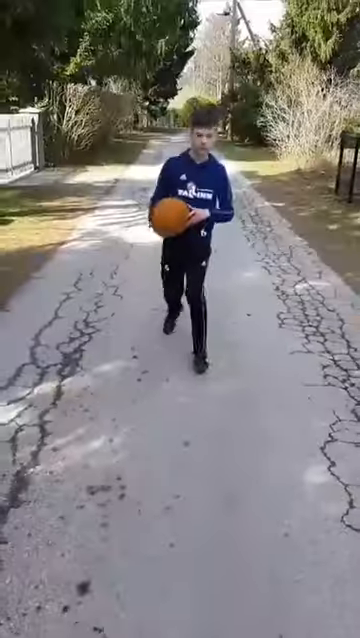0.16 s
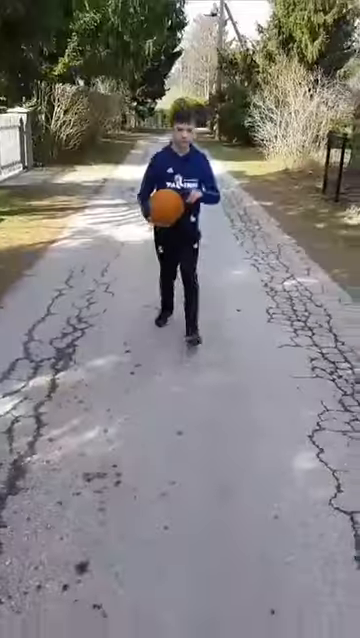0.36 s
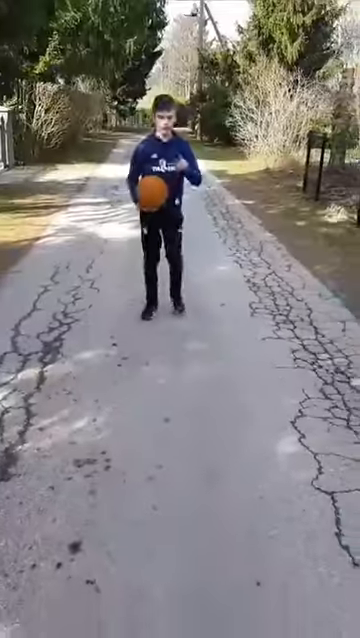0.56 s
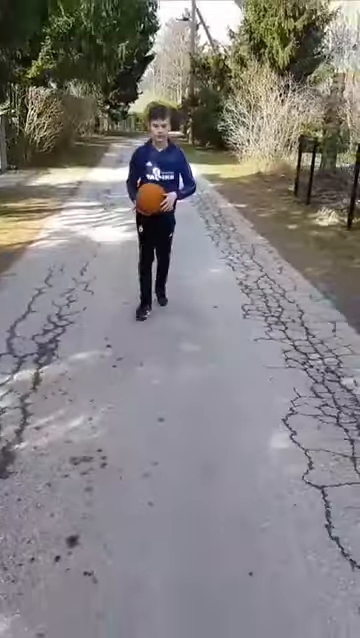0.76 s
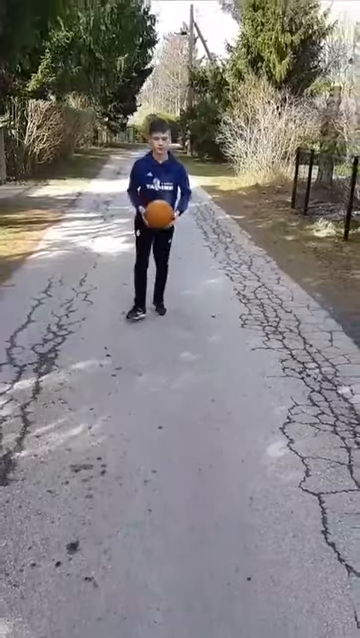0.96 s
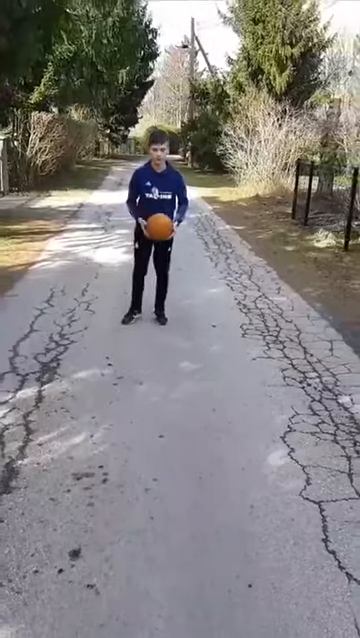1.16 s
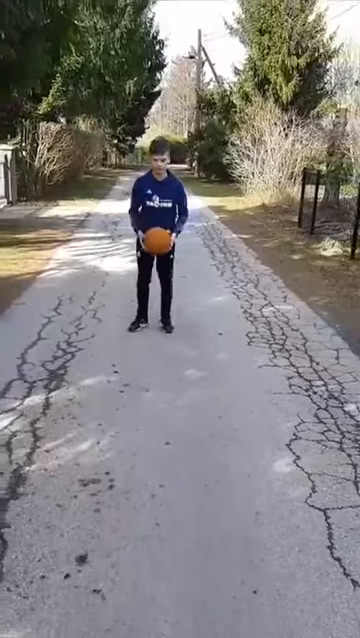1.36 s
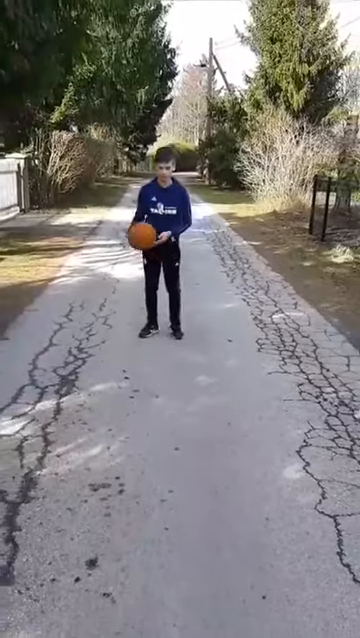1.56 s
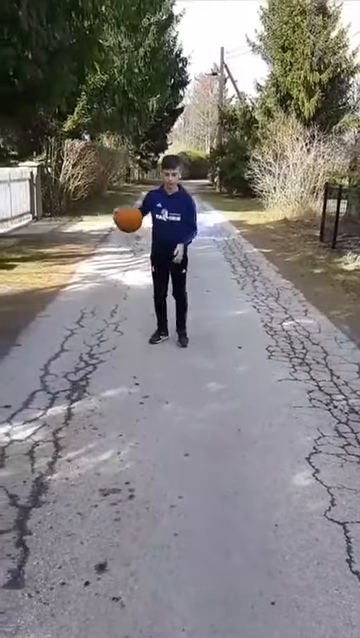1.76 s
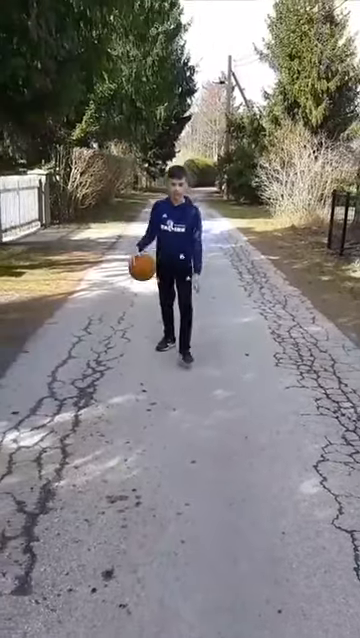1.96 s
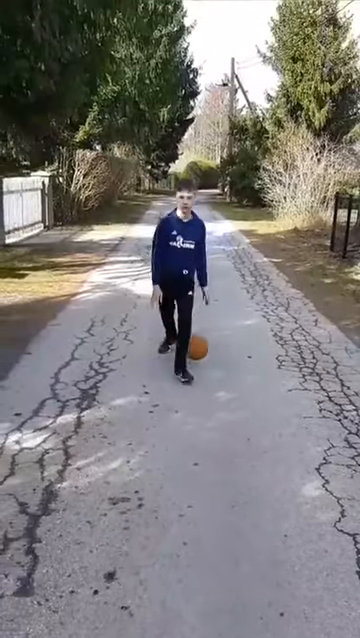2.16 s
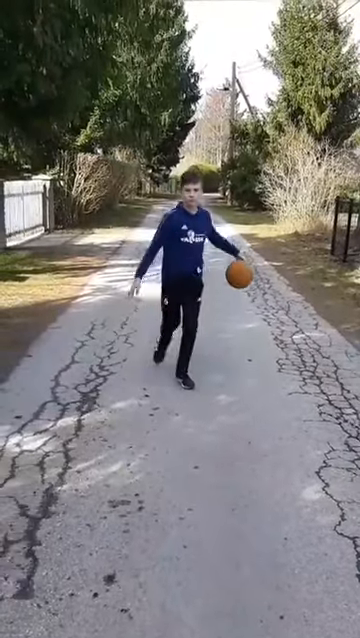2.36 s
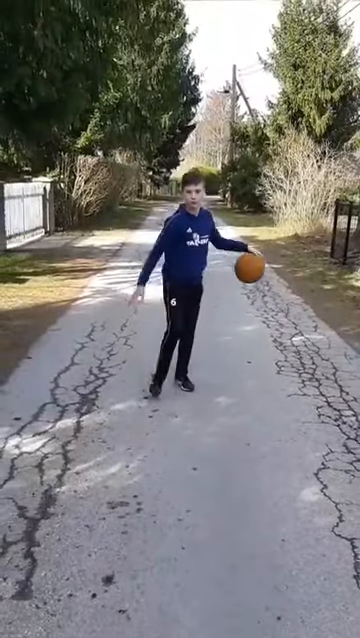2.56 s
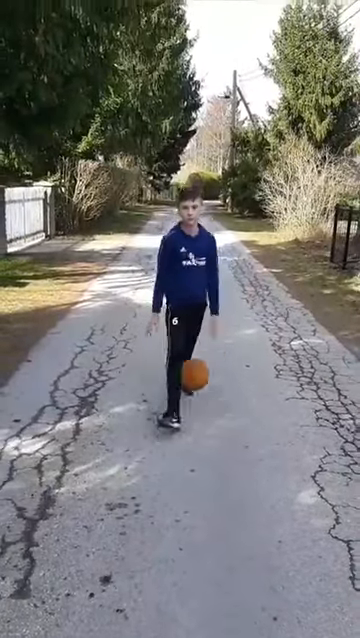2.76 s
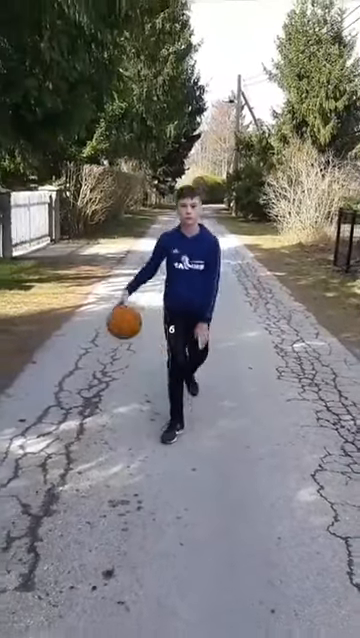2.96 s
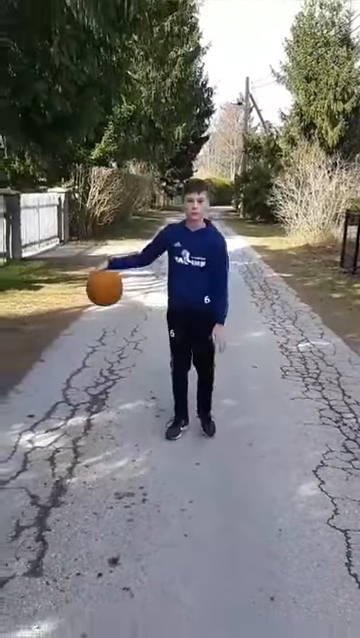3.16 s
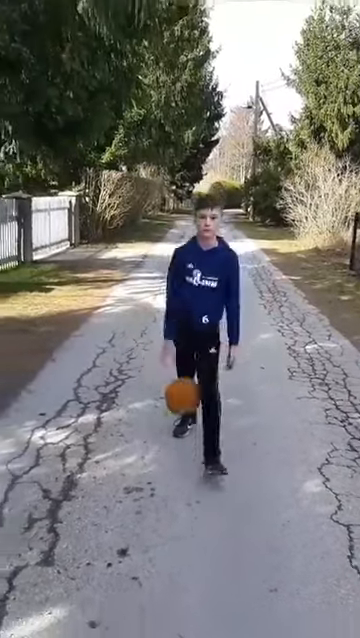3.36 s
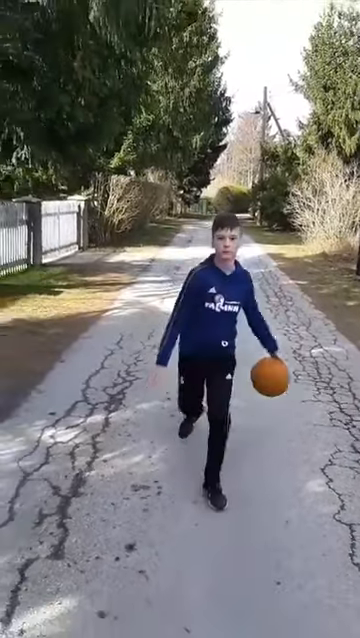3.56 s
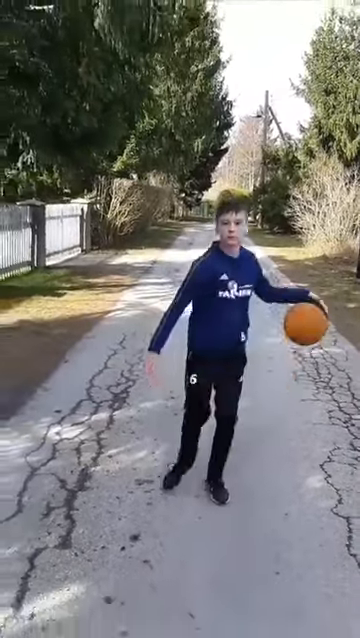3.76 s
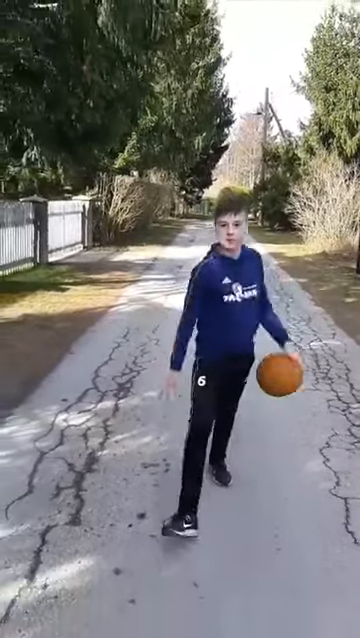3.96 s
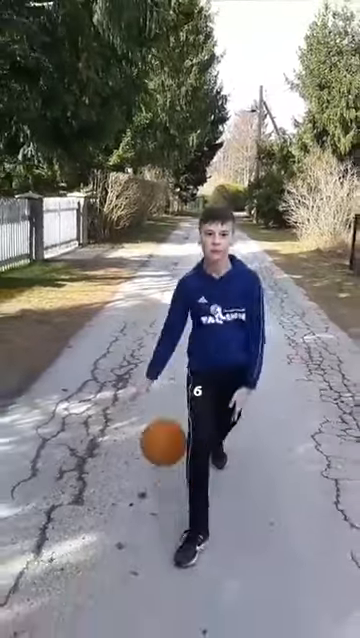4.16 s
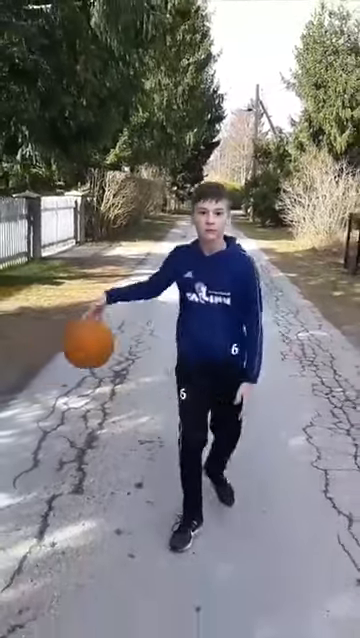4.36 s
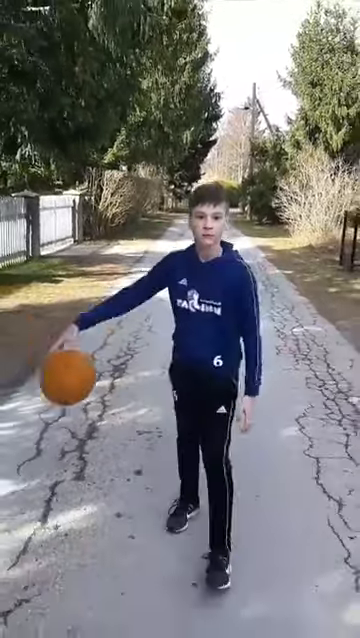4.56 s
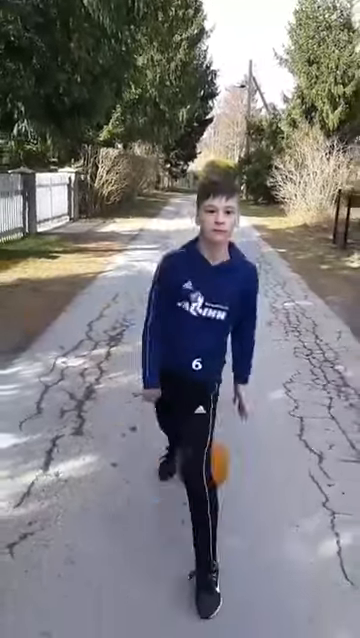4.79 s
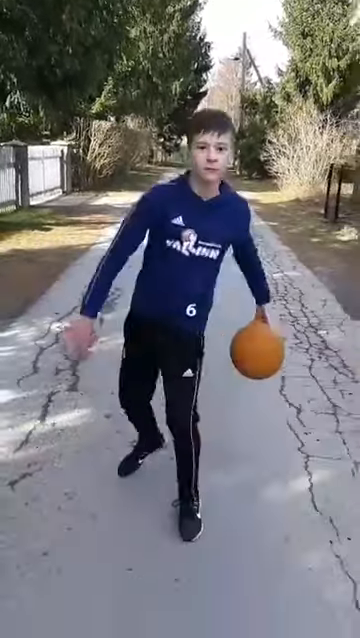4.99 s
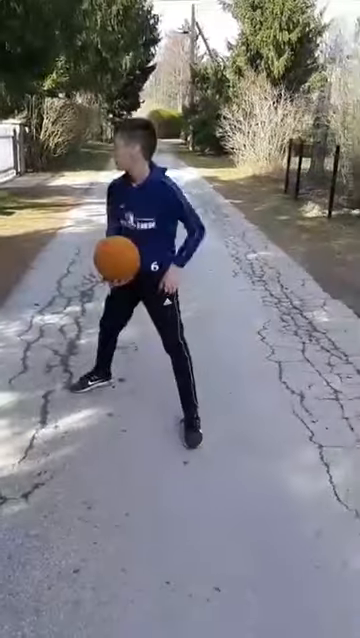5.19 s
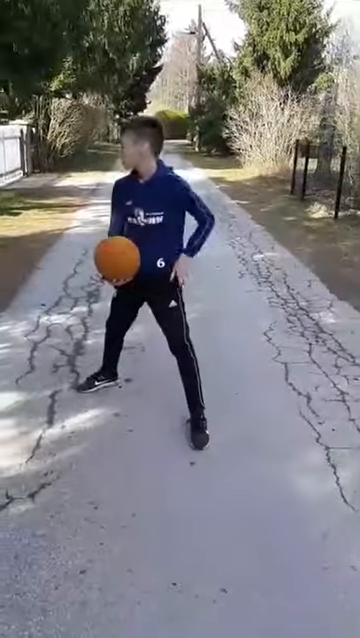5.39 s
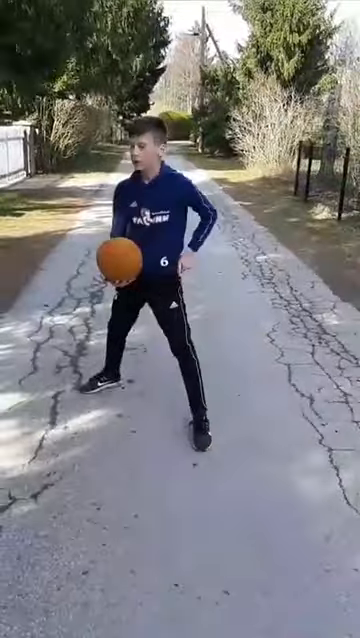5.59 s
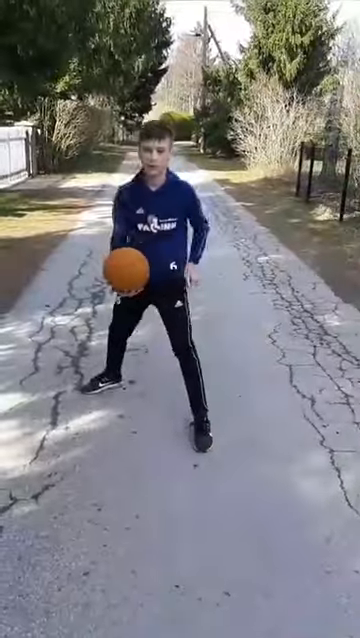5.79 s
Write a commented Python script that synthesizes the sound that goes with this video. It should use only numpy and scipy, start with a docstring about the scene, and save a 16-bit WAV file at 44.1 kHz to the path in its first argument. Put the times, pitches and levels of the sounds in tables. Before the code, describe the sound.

A quiet outdoor lane has a low hush of still air and faint distant birds, one repeating a high two-note song. A soft bump on the microphone comes at about 0.2 seconds, and shoes scuff on gritty asphalt a few times until about 1.3 seconds. At 2.2 seconds a basketball starts bouncing, with further bounces at about 2.9, 3.5, 4.2 and 4.8 seconds. These five are by far the loudest sounds, each a thump with a rubbery slap, a faint hollow ping and a short echo. Between them come light footsteps, ticks of grit and soft pats of a palm meeting the ball. A far crow caws faintly twice just after 3 seconds and once near 5.2. After a last pat and scuff around 4.9 seconds, a few dull finger knocks and a low rumble touch the microphone from 5.3 to 5.8 seconds.

```python
"""A basketball is dribbled five times on a quiet asphalt lane by a boy who first shuffles back.
Each impact gives a thump, a rubbery slap of the shell and a faint ping of the enclosed air;
fences and hedges reflect and scatter it, and his hand meets the rising ball.
Shoes scuff on grit; a tit, other songbirds and a crow call from the trees.
Beneath lie the hush of still air and the knocks and rumble of a hand on the microphone."""
import sys
import numpy as np
from scipy import signal
from scipy.fft import rfft, irfft
from scipy.io import wavfile

SR = 44100
rng = np.random.default_rng(int(sys.argv[2]) if len(sys.argv) > 2 else 0)


def digitize_waveform(pressure):
    """Quantize a signal to 16-bit integers and store it at the path in sys.argv[1].

    Rows of a 2-D input are taken as channels; values are limited to [-1, 1].
    """
    field = np.atleast_2d(pressure).T
    bounded = np.clip(field, -1, 1)
    quanta = np.round(bounded * 32767).astype(np.int16)
    wavfile.write(sys.argv[1], SR, quanta)


N = 257103
TIME = np.arange(N) / SR

# Coherence of diffuse sound between left and right: frequency_hz, coherence
COHERENCE = [(30, 0.23), (120, 1), (500, 0.74), (1200, 0.67), (3000, 0.2), (12000, .1)]


def from_db(db):
    """Amplitude ratio of a level in decibels."""
    return 10 ** (np.asarray(db) / 20)


def rms_one(x):
    """Normalisation to unit power."""
    return x / np.sqrt(np.mean(x ** 2) + 1e-20)


def peak_one(x):
    """Normalisation to unit peak."""
    return x / np.max(np.abs(x))


def at_hz(table, hz, column=1):
    """Interpolation of one column on a log-frequency axis."""
    table = np.array(table)
    return np.interp(np.log(hz), np.log(table[:, 0]), table[:, column])


def band(x, low_hz, high_hz, order=2):
    """Causal band-pass filter."""
    return signal.sosfilt(signal.butter(order, [low_hz, high_hz], "band", fs=SR, output="sos"), x)


def lowpass(x, cut_hz, order=1):
    """Causal low-pass filter."""
    return signal.sosfilt(signal.butter(order, cut_hz, fs=SR, output="sos"), x)


def add(out, start_s, sound):
    """Superposition of a short sound on the track."""
    start = int(round(start_s * SR))
    sound, start = sound[..., max(-start, 0):], max(start, 0)
    out[..., start:start + sound.shape[-1]] += sound[..., :max(N - start, 0)]


def stereo_pair(mid, side, hz):
    """Partial coherence: left and right are a weighted sum and difference of independent noises."""
    alike = at_hz(COHERENCE, hz)
    return (np.sqrt(1 + alike) * mid + np.sqrt(1 - alike) * side * np.array([[1], [-1]])) / np.sqrt(2)


def panned(x, right_db):
    """A level difference between the channels gives direction."""
    return x * from_db([[-right_db / 2], [right_db / 2]])


def noise(spectrum, grain_db=0):
    """Spectrally shaped stereo noise of unit power; uneven sample levels make it grainy."""
    hz = np.maximum(np.fft.rfftfreq(N, 1 / SR), 1)
    grains = rng.standard_normal((2, N)) * from_db(grain_db * np.minimum(rng.exponential(1, N), 6))
    return rms_one(irfft(stereo_pair(*rfft(grains), hz) * from_db(at_hz(spectrum, hz)), N))


def scatter(x, bands, start_s, build_s):
    """Diffuse scattering: dense echoes build up, then decay exponentially in each band."""
    t = TIME[:SR * 3 // 4]
    since, response = np.maximum(t - start_s, 0), 0
    white = rng.standard_normal((2, 2, len(t)))  # neighbouring bands get independent noise
    edges_hz = np.geomspace(50, 16000, 15)
    for k, (low, high) in enumerate(zip(edges_hz, edges_hz[1:])):
        hz = np.sqrt(low * high)
        envelope = (1 - np.exp(-since / build_s)) * from_db(-60 * since / at_hz(bands, hz, column=2))
        echoes = rms_one(band(stereo_pair(*white[k % 2], hz) * envelope + 1e-18, low, high))
        band_share = np.sqrt(2 * (high - low) / (SR * len(t)))
        response = response + from_db(at_hz(bands, hz)) * echoes * band_share
    return signal.fftconvolve(np.atleast_2d(x), response, axes=1)[:, :N]


def still_air(level_db=-65):
    """Ambient noise: a steady outdoor hush, strongest in the bass."""
    # Spectral density of the hush: frequency_hz, relative_db
    spectrum = [(15, -22.5), (25, -22), (75, -1), (119, -3), (274, -10.5), (871, -13), (1140, -18.5),
                (3090, -26), (4260, -19.5), (5430, -27.5), (6920, -23), (8580, -31), (15500, -27)]
    return from_db(level_db) * panned(noise(spectrum), right_db=1.5)


def grip(resting_db=-71):
    """Structure-borne noise: a hand rumbles on the microphone casing, more as it shifts."""
    # Shifts of the hand: centre_s, half_length_s, level_db, right_db
    shifts = [(0.18, 0.057, -48, 8), (0.417, 0.27, -63, 9), (5.292, 0.14, -50.5, -10),
              (5.705, 0.21, -43, 8.5)]
    # Spectrum of the rubbing: frequency_hz, relative_db
    spectrum = [(25, -9.5), (80, 2), (170, -7.5), (330, -23.5), (800, -23)]
    rubbing = sum(panned(from_db(db) * np.exp(-((TIME - centre_s) / half_s) ** 2), right_db)
                  for centre_s, half_s, db, right_db in shifts)
    return (from_db(resting_db) + rubbing) * lowpass(noise(spectrum), 700, order=4)


def bumps(pitch_hz=129.6, spread=1.38):
    """Damped impulse response: fingers knock dully on the casing."""
    # Knocks, each close to one microphone port: start_s, level_db, right_db
    knocks = [(.178, -45.5, 11), (5.293, -36.5, -19), (5.506, -41, 14), (5.651, -38, 16),
              (5.706, -38.5, 20.5)]
    out = np.zeros((2, N))
    impulse = (TIME[:SR // 8] == 0) + 1e-18
    knock = peak_one(band(impulse, pitch_hz / spread, pitch_hz * spread))
    for start_s, db, right_db in knocks:
        add(out, start_s, panned(from_db(db) * knock, right_db))
    return out


def among_trees(x, wet_db, t60_s):
    """Reverberation: scattering between trees prolongs a far call."""
    bands = [(100, wet_db, t60_s), (10000, wet_db, t60_s)]
    return x + scatter(x, bands, start_s=0.0039, build_s=0.0055)


def crow(jitter=.09, sag=.04, arch=.035, throat_width_hz=750):
    """Source and filter: uneven pulses excite a broad throat resonance; the pitch arches, then sags."""
    # Caws: start_s, length_s, pitch_hz, throat_hz, roughness, level_db
    caws = [(3.099, 0.17, 263, 1490, 0.7, -60), (3.203, 0.29, 303.3, 1690, 0.7, -62.5),
            (5.172, 0.175, 319.5, 1630, 0.5, -58.5)]
    out = np.zeros(N)
    for start_s, length_s, pitch_hz, throat_hz, rough, db in caws:
        along = TIME[:int(length_s * SR)] / length_s
        effort = np.sin(np.pi * along)
        wobble = rms_one(lowpass(rng.standard_normal(len(along)), 300))
        contour = 1 + arch * (effort - effort.mean()) - sag * along ** 4 + jitter * rough * wobble
        cycles = np.cumsum(pitch_hz * contour) / SR
        shimmer = 1 + .5 * rough * rng.standard_normal(len(along))
        pulses = np.diff(np.floor(cycles), prepend=0) * shimmer
        voice = band(pulses, throat_hz - throat_width_hz / 2, throat_hz + throat_width_hz / 2, order=3)
        add(out, start_s, from_db(db) * rms_one(voice * effort ** .4))
    return out


def note(length_s, pitches_hz, waver_hz=20, waver_rate_hz=120):
    """Frequency modulation: a tone glides through three pitches; a fast, wide waver makes it buzz."""
    t = TIME[:int(length_s * SR)]
    glide_hz = np.polyval(np.polyfit([0, .5, 1], pitches_hz, 2), t / length_s)
    hz = glide_hz + waver_hz * rms_one(lowpass(rng.standard_normal(len(t)), waver_rate_hz, order=2))
    return rms_one(np.sin(np.pi * t / length_s) ** 0.477 * np.sin(2 * np.pi * np.cumsum(hz) / SR))


def tit(period_s=.42, buzz_after_s=.165, echo_db=-15):
    """Periodic song: a whistle alternates with a lower, rising buzz; a soft echo trails each."""
    # Bouts of song: first_phrase_s, last_phrase_s, whistle_db, buzz_db
    bouts = [(-.134, .702, -60, -65), (1.119, 1.96, -58, -68), (3.656, 4.08, -61, -65.5),
             (5.275, 5.275, -69, -68.5)]
    out = np.zeros(N)
    for first_s, last_s, whistle_db, buzz_db in bouts:
        for start_s in np.arange(first_s, last_s + period_s / 2, period_s):
            add(out, start_s, from_db(whistle_db) * note(0.066, [4490, 4410, 4370]))
            add(out, start_s + 0.066, from_db(whistle_db + echo_db) * note(0.13, [4380, 4390, 4400]))
            buzz_s = start_s + buzz_after_s
            buzz = note(0.078, [3630, 3690, 3730], waver_hz=125, waver_rate_hz=170)
            add(out, buzz_s, from_db(buzz_db) * buzz)
            add(out, buzz_s + .06, from_db(buzz_db + echo_db) * note(.16, [3700, 3710, 3710]))
    return out


def far_songbirds(fall_back=0.33, twitter_count=4, until_s=1.4, twitter_s=0.035, twitter_db=-79):
    """Frequency glides: whistles and faint random twitters slide onto a pitch, then partly back."""
    # Whistles, thin and high or low and fluting: start_s, length_s, pitch_hz, slide_hz, level_db
    whistles = [(.388, 0.13, 7360, 340, -77), (.854, 0.065, 6580, -150, -73),
                (1.408, .094, 6220, -310, -70), (1.554, .24, 7200, 600, -75),
                (1.871, 0.069, 7500, -150, -75.5), (2.109, 0.083, 1948, 95, -75),
                (2.372, 0.14, 2230, 108, -78), (2.62, 0.18, 1984, -79.5, -79)]
    twitters = [(until_s * (k + rng.random()) / twitter_count, twitter_s,
                 6900 + rng.uniform(-120, 120), -120, twitter_db) for k in range(twitter_count)]
    out = np.zeros(N)
    for start_s, length_s, hz, slide_hz, db in [*whistles, *twitters]:
        pitches_hz = [hz - slide_hz, hz, hz - fall_back * slide_hz]
        add(out, start_s, from_db(db) * note(length_s, pitches_hz, waver_hz=30))
    return out


def contact(peak_s, db, rubber_db=0, *, rise_s, t60_s, thud_db, scrape_db, grit_db):
    """Envelopes of one touch's thud, scrape and grit: a Gaussian rise, then exponential decay."""
    t = TIME[:SR // 2] - .1
    stroke = np.exp(-(np.minimum(t, 0) / rise_s) ** 2) * from_db(-60 * np.maximum(t, 0) / t60_s)
    parts_db = np.array([[thud_db + rubber_db], [scrape_db + rubber_db], [grit_db]])
    envelopes = np.zeros((3, N))
    add(envelopes, peak_s + t[0], from_db(db + parts_db) * stroke)
    return envelopes


def scuffs(fingers_lead_s=0.019, fingers_db=-10.5, tick_db=-66.5, crunch_db=1, crunch_hz=160):
    """Impact and friction noise: soles land and drag on grit, a hand meets the ball, grains snap."""
    # A sole slides on asphalt: peak_s, level_db, rubber_db
    slides = [(0.265, -46, -9.5), (0.345, -58, -6), (0.761, -54.5, -8.5), (1.197, -45.5, -10),
              (3.702, -59, 5), (4.09, -60, -6.5), (4.886, -50.5, 0)]
    # A shoe lands: peak_s, level_db
    steps = [(2.188, -57.5), (3.586, -48), (3.667, -51.5), (4.116, -46.5), (4.141, -41), (5.106, -64.5)]
    # The palm meets the rising ball: peak_s, level_db
    catches = [(2.361, -49.5), (3.004, -45), (3.612, -38.5), (4.315, -56.5), (4.939, -35)]
    # A grain snaps under shoe or ball: peak_s, level_db
    snaps = [(2.840, -37), (3.952, -62), (4.059, -58), (4.49, -58), (4.783, -30), (5.148, -64.5)]
    # Spectra of thud, rubber scrape, loose grit and snapping grain: frequency_hz, relative_db
    thud_spectrum = [(60, -17), (150, -3), (320, -6.5), (550, 0.5), (800, -10.5), (1200, -21.5),
                     (3000, -54)]
    scrape_spectrum = [(400, -27), (900, -2.5), (1500, -0.5), (1950, 2), (2400, 2.5), (2850, -2.5),
                       (3300, -12), (5000, -34), (10000, -31)]
    grit_spectrum = [(1500, -5), (3000, 0), (4500, 6.5), (6900, 2), (8000, -6.5), (11000, -11.5),
                     (15500, -18.5)]
    snap_spectrum = [(600, -18), (2500, -9.5), (3600, -16.5), (5000, -0.5), (6700, 2.5), (8000, -19),
                     (15000, -32)]
    slide = dict(rise_s=0.023, t60_s=0.28, thud_db=-3, scrape_db=0.5, grit_db=0)
    step = dict(rise_s=0.0018, t60_s=0.16, thud_db=-3, scrape_db=-1, grit_db=-6)
    catch = dict(rise_s=0.004, t60_s=0.078, thud_db=-0.5, scrape_db=-18, grit_db=-37)
    snap = dict(rise_s=.0012, t60_s=0.037, thud_db=-26.5, scrape_db=-19, grit_db=1.5)
    ticks = [(peak_s, tick_db) for peak_s in rng.uniform(4.4, 4.75, 6)]  # loose grit underfoot
    fingertips = [(peak_s - fingers_lead_s, db + fingers_db) for peak_s, db in catches]
    touches = [(slide, slides), (step, steps), (step, ticks), (catch, fingertips), (catch, catches)]
    thud, scrape, grit = sum(contact(*row, **kind) for kind, rows in touches for row in rows)
    snap_thud, snap_scrape, snap_grit = sum(contact(*row, **snap) for row in snaps)
    # Grains roll and catch in clumps, so the level flutters.
    crunch = from_db(crunch_db * rms_one(lowpass(rng.standard_normal(N), crunch_hz, order=2)))
    return (panned((thud + snap_thud) * noise(thud_spectrum), right_db=-0.5)
            + panned((scrape + snap_scrape) * crunch * noise(scrape_spectrum, grain_db=3.5), right_db=6)
            + panned(grit * crunch * noise(grit_spectrum, grain_db=5), right_db=4)
            + panned(snap_grit * noise(snap_spectrum), right_db=14))


def bounce(thump_db, smack_db, slap_db, slap_hz, grit_db, spread=1.537, squash_s=0.0012):
    """Impact excites shell and cavity modes and crushes grit; returns direct and outgoing sound."""
    # Modes of the rubber shell: pitch_ratio, bandwidth_hz, level_db
    shell_modes = [(.85, 250, -17.5), (1.002, 310, 12.5), (1.25, 402, 9.5), (1.7, 550, -3.5),
                   (2.6, 450, -15)]
    # Modes of the enclosed air: pitch_hz, level_db, t60_s
    cavity_modes = [(572, -30, .1), (1174, -39, .13), (1385, -39, .13), (1530, -31, .19), (1603, -31, .22),
                    (1685, -35, .2), (2125, -39, .12), (3080, -51, .28), (3460, -48, .13), (4090, -54, .17)]
    t = TIME[:SR // 2]
    impulse = (t == 0) + 1e-18
    # The ball squashes and springs back in a few damped swings; a harder bounce thumps higher.
    thump_hz = 177.8 + 2 * thump_db
    swing = band(impulse, thump_hz / spread, thump_hz * spread)
    thump = np.interp(t - squash_s, t, peak_one(lowpass(swing, 870, order=2)), left=0)
    smack = peak_one(band(impulse, 300, 634.8))
    shell = sum(from_db(db) * np.exp(-np.pi * width_hz * t) * np.sin(2 * np.pi * ratio * slap_hz * t)
                for ratio, width_hz, db in shell_modes)
    slap = peak_one(band(shell, 160, 6500))
    blow = from_db(thump_db) * thump - from_db(smack_db) * smack - from_db(slap_db) * slap
    grit = rng.standard_normal(len(t)) * from_db(-60 * t / 0.014) + 1e-18
    crack = peak_one(band(grit, 3690, 6560, order=4) + from_db(-36.5) * band(grit, 2000, 12000))
    spray = peak_one(band(impulse, 2900, 7200))  # over all directions the grit's spectrum evens out
    cavity = sum(from_db(db - 60 * t / t60_s) * np.sin(2 * np.pi * hz * t)
                 for hz, db, t60_s in cavity_modes)
    ping = from_db(2 + (thump_db + slap_db) / 2) * cavity  # a harder blow rings louder
    return blow + ping + from_db(grit_db) * crack, blow + from_db(grit_db + 3) * spray


def dribble(port_lag_s=.00007, fence_db=-23, shade_db=-10):
    """Direct sound, reflection and scattering: each bounce arrives first, then its echoes."""
    # Ball on asphalt: start_s, thump_db, smack_db, slap_db, slap_hz, grit_db,
    # outgoing_db, near_echo_db, near_delay_s, fence_delay_s
    impacts = [(2.2104, -13, -20.5, -14, 1510, -18.5, 5, -12, 0.011, 0.072),
               (2.862, -6.5, -21.5, -1, 1717, -12.5, 0.5, -11.5, 0.012, 0.071),
               (3.4866, -10.5, -26, -5, 1953, -9, -0.5, -32.5, 0.013, .068),
               (4.1548, -4.5, -22, 0.5, 1666, -15, -3.5, -11, .0152, .074),
               (4.7856, -4.5, -28, -6.5, 1299, -8.5, -0.5, -6, .0170, .060)]
    # Scattering by near surfaces and by far trees: frequency_hz, level_db, t60_s
    near_surfaces = [(71.96, -35.5, 0.11), (160, -17.5, 0.044), (298, -8.5, 0.12), (600, 0.5, 0.058),
                     (989.5, -4.5, 0.094), (1700, -8, 0.078), (3000, -5, 0.13), (6050, -13, 0.18),
                     (12130, -8, 0.15)]
    far_trees = [(70, -26.5, 0.96), (160, -28.5, 0.7), (530, -21.5, 0.64), (1000, -21.5, .85),
                 (1706, -24.5, .7), (3300, -22, 0.86), (6200, -22.5, 0.3), (8500, -34, 0.37),
                 (14000, -17, 0.34)]
    direct, echoes, diffuse = np.zeros(N), np.zeros(N), np.zeros((2, N))
    for start_s, *strike, outgoing_db, near_echo_db, near_delay_s, fence_delay_s in impacts:
        heard, outgoing = bounce(*strike)
        outgoing *= from_db(outgoing_db)
        add(direct, start_s, heard)
        add(echoes, start_s + near_delay_s, from_db(near_echo_db) * band(outgoing, 1100, 3200))
        add(echoes, start_s + fence_delay_s, from_db(fence_db) * lowpass(outgoing, 540, order=2))
        add(diffuse, start_s, scatter(outgoing, near_surfaces, start_s=0.0046, build_s=0.0037))
        add(diffuse, start_s, scatter(outgoing, far_trees, start_s=0.034, build_s=0.0097))
    # The left port is reached later, and is shaded in the treble.
    late = np.interp(TIME - port_lag_s, TIME, direct, left=0) + 1e-18
    left = from_db(shade_db) * late + (1 - from_db(shade_db)) * lowpass(late, 1000)
    return panned(np.array([left, direct]) + echoes + diffuse, right_db=1.3)


def scene():
    """Superposition of birds, still air, ball, feet and handling noise."""
    birds = panned(among_trees(tit() + far_songbirds(), wet_db=1, t60_s=0.42), right_db=1.5)
    caws = panned(among_trees(crow(), wet_db=-6.5, t60_s=1.0), right_db=8)
    return birds + caws + still_air() + dribble() + scuffs() + bumps() + grip()


def record(dry, low_hz=30, high_hz=15850, ceiling=.9):
    """Band limiting and soft saturation: the microphone sheds deep bass and top, and rounds peaks."""
    thin = signal.sosfilt(signal.butter(1, low_hz, "high", fs=SR, output="sos"), dry)
    rounded = thin / (1 + (thin / ceiling) ** 6) ** (1 / 6)
    return signal.sosfilt(signal.ellip(10, .1, 80, high_hz, fs=SR, output="sos"), rounded)


dry = scene()
out = record(dry)
digitize_waveform(out)
```